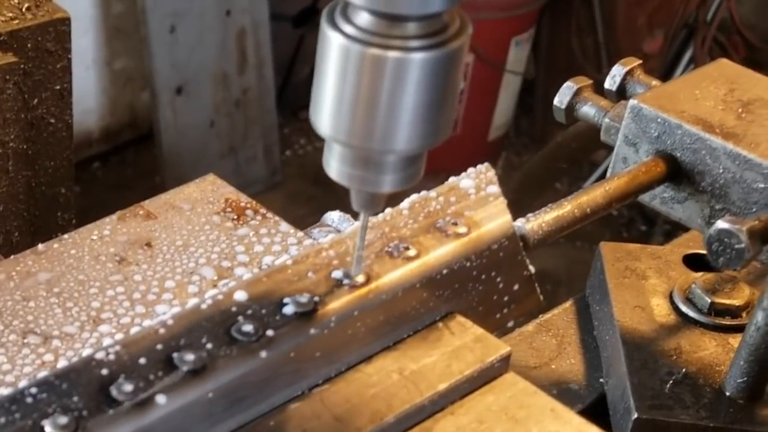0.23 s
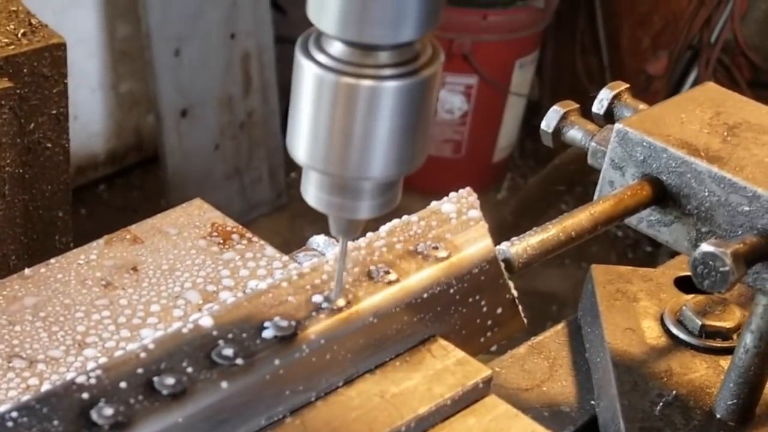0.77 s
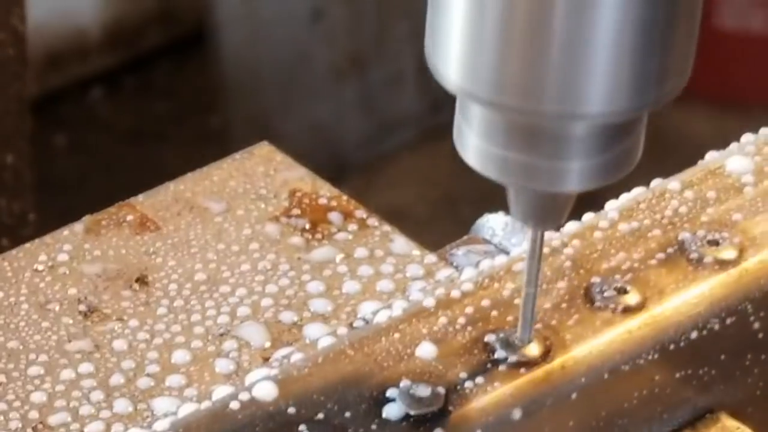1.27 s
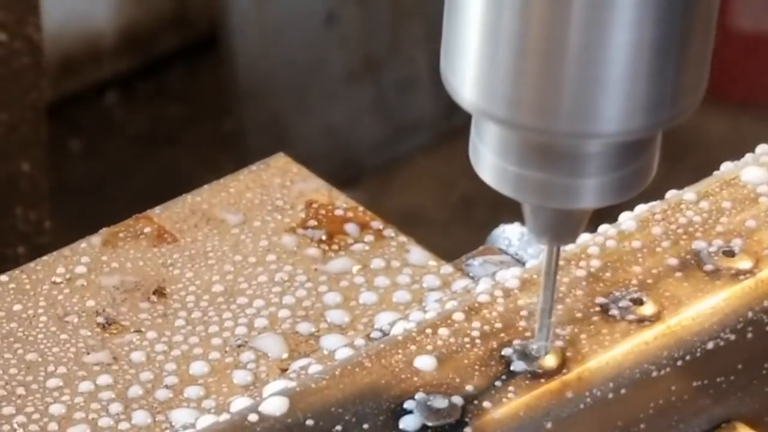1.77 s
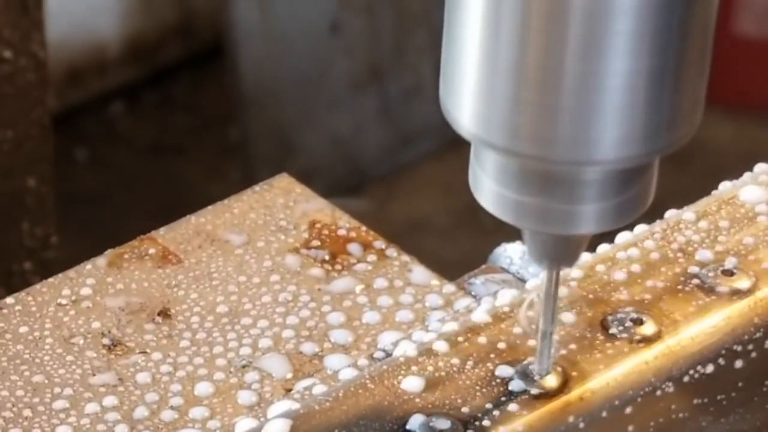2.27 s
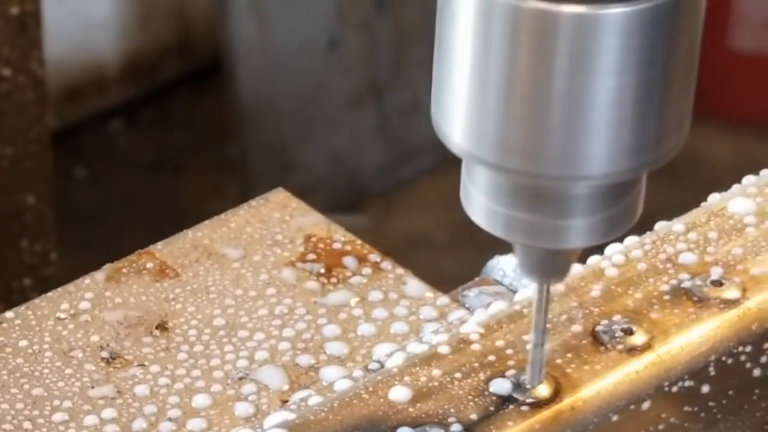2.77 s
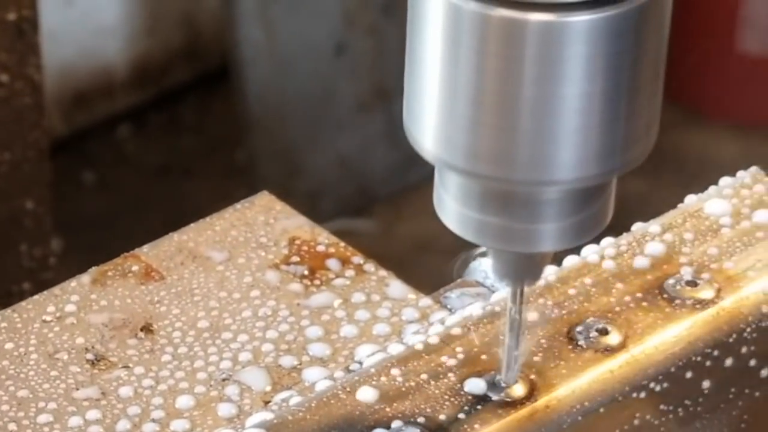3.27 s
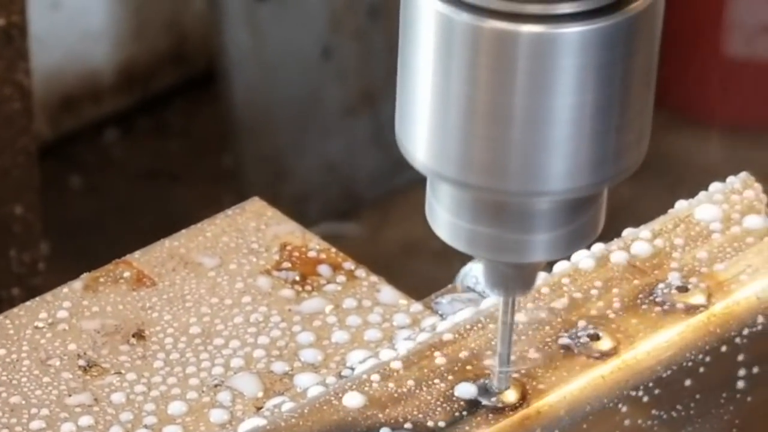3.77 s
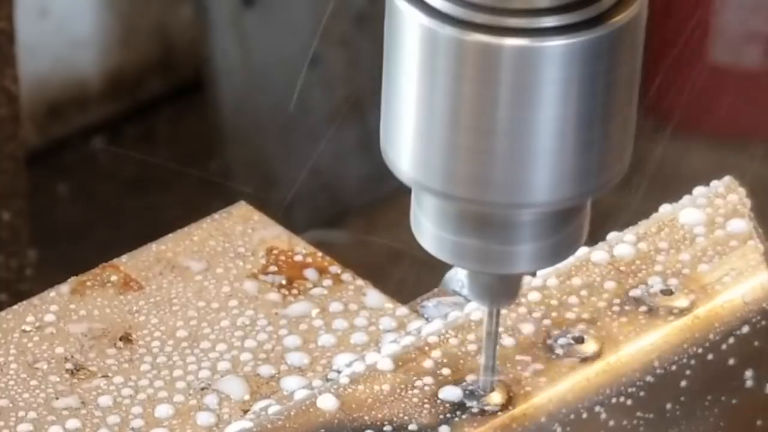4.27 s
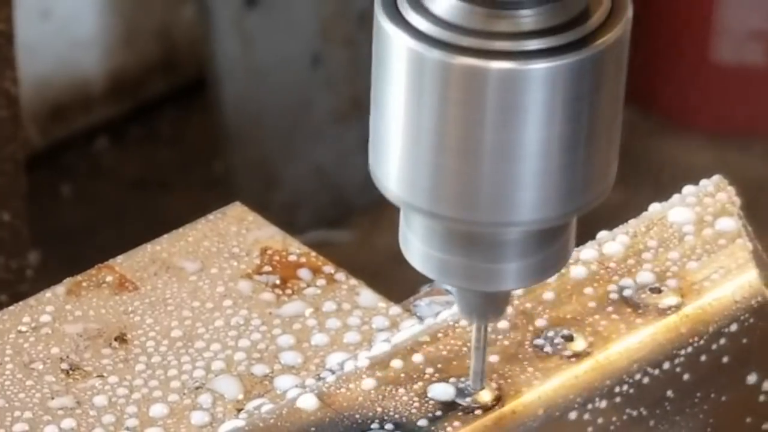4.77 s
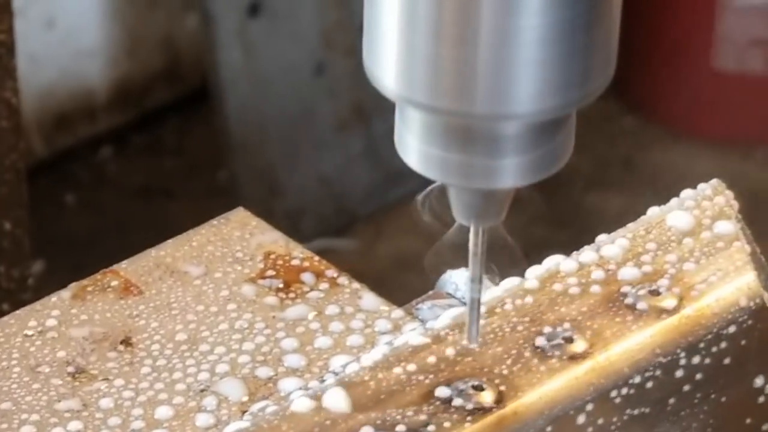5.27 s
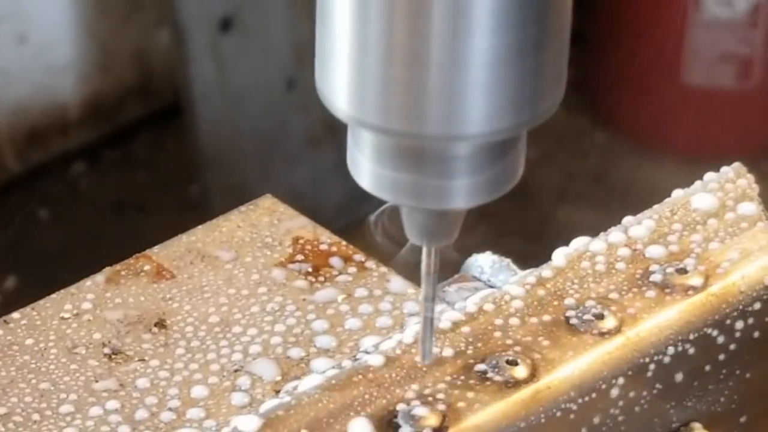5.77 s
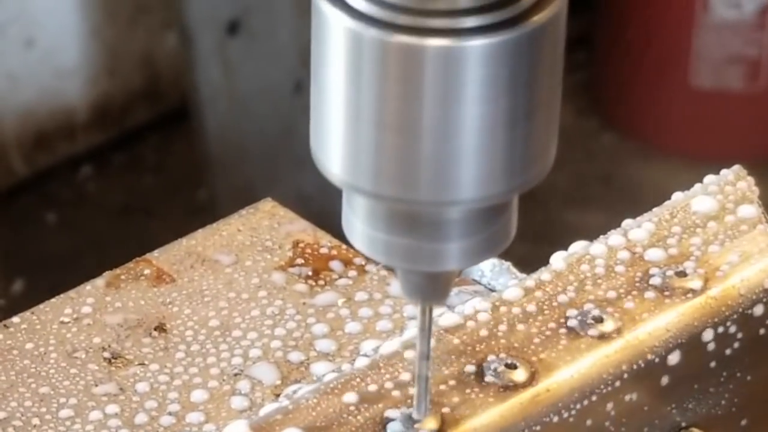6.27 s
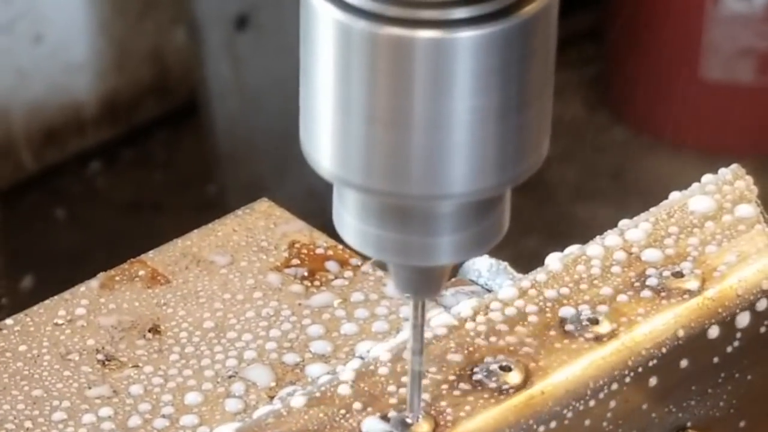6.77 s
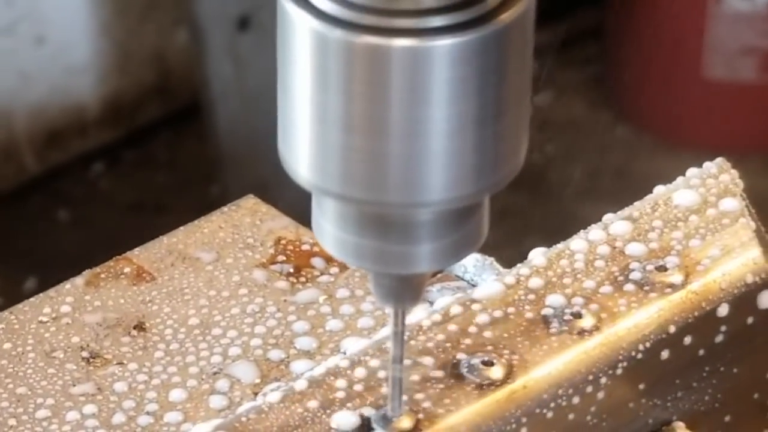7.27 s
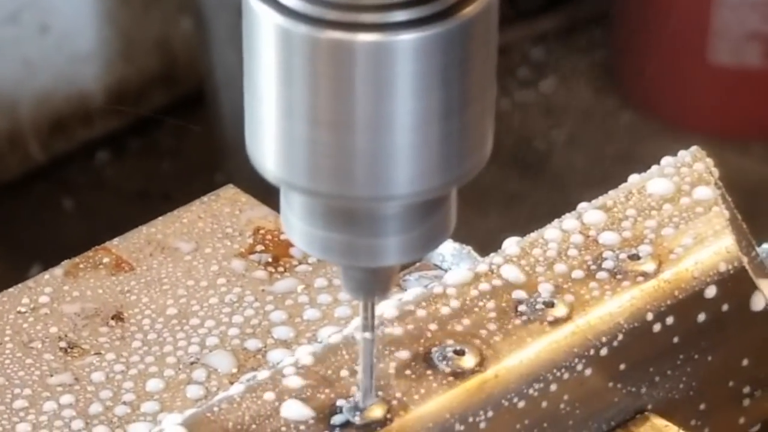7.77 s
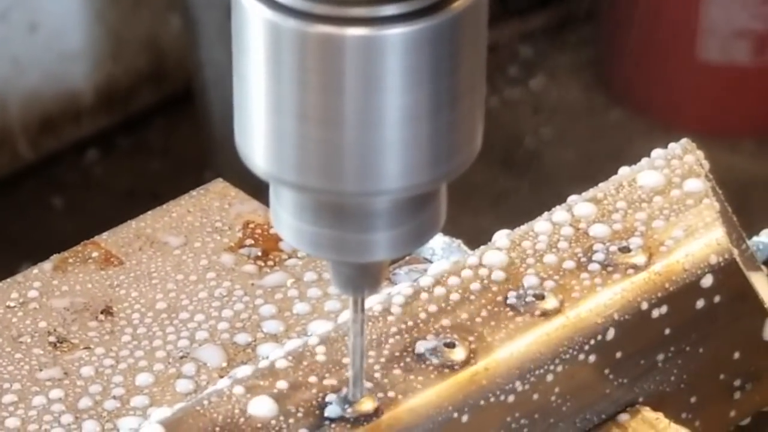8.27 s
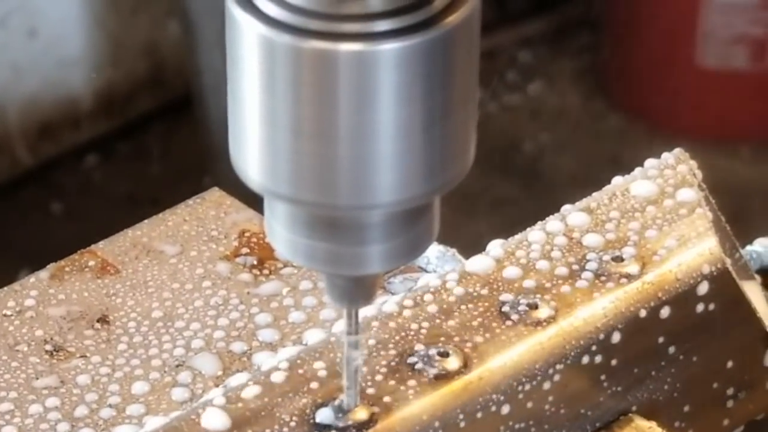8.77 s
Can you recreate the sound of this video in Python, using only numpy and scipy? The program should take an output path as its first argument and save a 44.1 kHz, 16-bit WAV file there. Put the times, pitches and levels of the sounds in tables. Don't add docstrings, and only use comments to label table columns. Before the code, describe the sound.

From 0 s a mist nozzle is already running at full blast, about half a metre from a hand-held stereo phone in a machine shop. It makes a loud, dense, sizzling hiss, strongest in the top treble and thin below, with fine coolant droplets ticking on steel and a duller splash at the drill hole. Deep underneath, a faint steady drive hums with gear mesh whine, pump tones and a fast throbbing casing rumble. The hiss dips slightly around 1-1.7 s, lifts near 2.5 s, eases again to about 4 s, then swells briefly at 4.75 s. From about 5.8 s it holds slightly stronger, rising a touch more at 9 s. Close metallic reflections colour it, shifting slowly as the phone turns, especially after 3 s. It never pauses and ends still hissing.

```python
import sys
import numpy as np
from scipy import signal
from scipy.fft import rfft, irfft, next_fast_len
from scipy.io import wavfile
from scipy.ndimage import uniform_filter1d, minimum_filter1d

SR = 44100
rng = np.random.default_rng(int(sys.argv[2]) if len(sys.argv) > 2 else 0)


def gain_from_db(level_db):
    decades = np.asarray(level_db, float) / 20
    return 10 ** decades


def waveform_to_disk(signal):
    frames = np.transpose(np.atleast_2d(signal))
    scaled = np.clip(frames, -1, 1) * 32767
    samples = np.round(scaled).astype(np.int16)
    wavfile.write(sys.argv[1], SR, samples)


N = 398223
TIME = np.arange(N) / SR


def curves(table):
    s, *columns = np.transpose(table)
    return [np.interp(TIME, s, c) for c in columns]


def unit(x):
    return x / np.sqrt(np.mean(x ** 2))


def over_hz(points, hz):
    p = np.array(points, float)
    return np.interp(np.log(np.maximum(hz, 1)), np.log(p[:, 0]), p[:, 1])


def walk(rate_hz):
    held = np.repeat(rng.standard_normal(int(N * rate_hz / SR) + 2), 8)
    slewed = uniform_filter1d(uniform_filter1d(held, size=8), size=8)
    return np.interp(TIME * rate_hz * 8, np.arange(len(held)), unit(slewed))


def coloured(x, gain):
    size = next_fast_len(N)
    return irfft(rfft(x, size) * gain(np.arange(size // 2 + 1) * SR / size), size)[:N]


def dull(x, corner_hz):
    return coloured(x, lambda hz: 1 / np.sqrt(1 + (hz / corner_hz) ** 2))


def delay_line(x):
    finer = 4
    size = next_fast_len(N)
    fine = finer * irfft(rfft(x, size), finer * size)
    slope = np.diff(fine, append=0)

    def read(delay_us):
        place = (np.arange(N) - delay_us * (SR / 10 ** 6)) * finer
        k = np.floor(place).astype(int)
        return fine[k] + (place - k) * slope[k]
    return read


# freq_hz, density_db_per_hz
JET_SPECTRUM = [(40, -95), (300, -58), (1300, -32), (1900, -28.5), (2300, -17.0), (3000, -11.0),
                (5000, -7.5), (6500, -11.5), (9000, -8.5), (10300, -6.9), (13000, -1.77), (14800, 0),
                (15700, -7.5)]


def jet_gain(hz):
    return gain_from_db(over_hz(JET_SPECTRUM, hz))


def shop_walls():
    walls = [unit(coloured(rng.standard_normal(N), jet_gain)) for _ in range(2)]
    return np.array([dull(wall, 4500) for wall in walls])


# freq_hz, density_db_per_hz
CASING_SPECTRUM = [(15, -57), (25, -20), (204, -5), (267, -1), (521, -5.5), (573, 1), (840, -2), (1060, -1),
                   (1250, -5.5), (1490, 0), (1730, -11), (1910, -1), (2400, -31), (3120, -28), (5280, -120)]
# freq_hz, width_hz, lift_db
PANEL_MODES = [(270, 60, 2), (403, 91, 4), (707, 90, 2.5), (775, 38, 4), (1041, 84, 7), (1140, 98, 8.5),
               (1903, 185, 7.5), (2030, 160, 9)]


def casing_gain(hz):
    lift_db = sum(db / (1 + (2 * (hz - mode_hz) / width_hz) ** 2) for mode_hz, width_hz, db in PANEL_MODES)
    return gain_from_db(over_hz(CASING_SPECTRUM, hz) + lift_db)


# freq_hz, likeness (-1 to 1)
CASING_LIKENESS = [(40, 0.93), (130, 0.98), (300, 0.5), (1000, 0.56), (1250, 0.27), (1600, -1.03),
                   (1950, 0.46)]


def casing_rumble(throb):
    def alike(hz):
        return np.clip(over_hz(CASING_LIKENESS, hz), -1, 1)

    mid = coloured(throb * rng.standard_normal(N), lambda hz: casing_gain(hz) * np.sqrt(1 + alike(hz)))
    side = coloured(throb * rng.standard_normal(N), lambda hz: casing_gain(hz) * np.sqrt(1 - alike(hz)))
    return unit(np.array([mid + side, mid - side]))


# order, level_db (re drive), left_minus_right_db
SHAFT_ORDERS = [(5, -28, 0), (9, -24, 1), (10, -22, 0), (16, -17, 0), (63, -20, 0), (64, -15, -2),
                (65, -15, -4), (66, -11, -1), (67, -19, -5)]
# order (of spindle), level_db (re drive), left_minus_right_db
MESH_ORDERS = [(24, -24, 3), (27, -22, 3), (28, -8, 3), (29, -22, 3), (30, -18, 2), (33, -17, 1),
               (36, -19, 0)]
# freq_hz, level_db (re drive)
PUMP_TONES = [(179, -25.5), (266.5, -23.5), (293.4, -16.5), (337.8, -23), (388, -20.5), (675.6, -14)]


def drive():
    shaft_hz, spindle_hz = 16.005, 20.675
    tones = [(order * shaft_hz, db, pan_db) for order, db, pan_db in SHAFT_ORDERS]
    tones += [(order * spindle_hz, db, pan_db) for order, db, pan_db in MESH_ORDERS]
    tones += [(hz, db, 0) for hz, db in PUMP_TONES]
    run_s = np.cumsum(1 + 0.0007 * walk(1.52)) / SR
    hum = np.zeros((2, N))
    for hz, db, pan_db in tones:
        tone = np.sin(2 * np.pi * (hz * run_s + rng.random()))
        pan = gain_from_db(np.array([[pan_db], [-pan_db]]) / 2)
        hum += np.sqrt(2) * gain_from_db(db - 1.5 + 1.2 * walk(3.07)) * tone * pan
    throb = 1 + 0.28 * np.sin(2 * np.pi * 3 * shaft_hz * run_s)
    return hum + gain_from_db(3.0) * casing_rumble(throb * gain_from_db(0.5 * walk(11)))


def droplets():
    hit = rng.random(N) < 400 / SR
    return unit(hit * gain_from_db(3.4 * rng.exponential(size=N)) * rng.standard_normal(N))


def hiss(steel_db, surge_db, flicker_db, drop_db):
    size = next_fast_len(N)
    hz = np.maximum(np.arange(size // 2 + 1) * SR / size, 1)
    octave, colour = np.log2(hz / 1000), jet_gain(hz)
    air = colour * rfft(rng.standard_normal(N), size)
    drops = colour * rfft(droplets(), size)
    surge = surge_db * walk(9)
    out = 0
    for centre in np.arange(0, 4.1, 0.5):
        strand = np.cos(np.pi / 2 * np.clip(2 * (octave - centre), -1, 1)) ** 2
        low = 1 / (1 + (1000 * 2 ** centre / 6000) ** 4)
        mix = irfft((air + gain_from_db(drop_db) * low * drops) * strand, size)[:N]
        flicker = flicker_db * (walk(6) + 0.64 * walk(18))
        out = out + mix * gain_from_db(surge + low * steel_db + flicker)
    return unit(out)


# time_s, turn (0-1)
HAND_TURN = [
    (0, .29),
    (1, .36),
    (2, .32),
    (3, .49),
    (4, .63),
    (5, .62),
    (6, .77),
    (7, .85),
    (8, 1.05),
    (9.03, .88),
]


def turned(start, end):
    turn, = curves(HAND_TURN)
    return start + (end - start) * turn


def splash(steel_db):
    at = delay_line(dull(hiss(steel_db, surge_db=0.5, flicker_db=0.8, drop_db=-10), 9000))
    left_lag_us = turned(78, 54)
    return np.array([at(left_lag_us), at(0 * TIME)])


def far_parts(nozzle, nozzle_us):
    count, nearest_us, farthest_us, drift_us = 6, 1400, 5600, 25
    nearest_db, fade_db = -7.5, -3
    echoes = 0
    for depth in (np.arange(count) + rng.random(count)) / count:
        delay_us = nearest_us + (farthest_us - nearest_us) * depth ** 2 + drift_us * walk(0.497)
        echoes = echoes + gain_from_db(nearest_db + fade_db * depth) * nozzle(delay_us)
    far = delay_line(echoes)
    return np.array([far(nozzle_us + 12 * walk(1.5)), far(0 * TIME)])


FACE_DELAYS = [(508.0, 455.0, 579.0, 589.0), (228.0, 112.0, 140.0, 114.0), (536.0, 315.0, 483.0, 469.0),
               (791.0, 802.0, 800.0, 815.0), (328.0, 119.0, 240.0, 244.0), (596.0, 600.0, 409.0, 428.0),
               (934.0, 854.0, 946.0, 925.0), (294.0, 141.0, 103.0, 62.0), (1220.0, 1265.0, 1175.0, 1148.0),
               (282.0, 258.0, 172.0, 172.0), (1020.0, 979.0, 902.0, 893.0), (1232.0, 1106.0, 1032.0, 996.0)]
FACE_GAINS = [(0.33, 0.45), (0.18, 0.28), (0.25, 0.24), (0.16, -0.59), (-0.7, -0.23), (-0.67, -0.14),
              (-0.15, -0.53), (0.59, 0.52), (0.18, 0.13), (0.36, 0.51), (-0.22, -0.08), (0.18, -0.28)]


def nozzle_jet(steel_db):
    nozzle = delay_line(hiss(steel_db, surge_db=0.56, flicker_db=0.77, drop_db=-12))
    nozzle_us = turned(116, 66)
    left, right = nozzle(nozzle_us), nozzle(0 * TIME)
    for delays_us, gains in zip(FACE_DELAYS, FACE_GAINS):
        gain = turned(*gains)
        left = left + gain * nozzle(turned(*delays_us[:2]))
        right = right + gain * nozzle(turned(*delays_us[2:]))
    return np.array([left, right]) + far_parts(nozzle, nozzle_us)


def mist(flow_db, steel_db):
    return gain_from_db(flow_db) * (nozzle_jet(steel_db) + gain_from_db(-1.5) * splash(steel_db) + gain_from_db(-7) * shop_walls())


# time_s, flow_db
AIR_FLOW = [(0.0, -18), (0.2, -18), (0.75, -18), (0.9, -19), (1.7, -19), (2.5, -17), (3.3, -18),
            (4.12, -18.5), (4.75, -15), (4.85, -17.5), (5.8, -16.5), (7.67, -16.5), (8.7, -16.5),
            (9.03, -15)]


def scene():
    flow_db, = curves(AIR_FLOW)
    usual_flow_db, steel_per_flow_db = -17, -0.6
    steel_db = 1 + steel_per_flow_db * (flow_db - usual_flow_db)
    return mist(flow_db + 0.58, steel_db) + gain_from_db(-41.5) * drive()


def low_pass(x):
    return signal.sosfilt(signal.butter(12, 15800, fs=SR, output="sos"), x)


def record(dry):
    top_hz, ceiling = 15760, 0.93
    ports = np.array([coloured(port, lambda hz: np.clip((top_hz - hz) / 60, 0, 1)) for port in dry])
    room_left = ceiling / np.maximum(np.abs(ports).max(axis=0), ceiling)
    gain = uniform_filter1d(minimum_filter1d(room_left, size=257), size=257)
    return low_pass(gain * ports)


dry = scene()
out = record(dry)
waveform_to_disk(out)
```